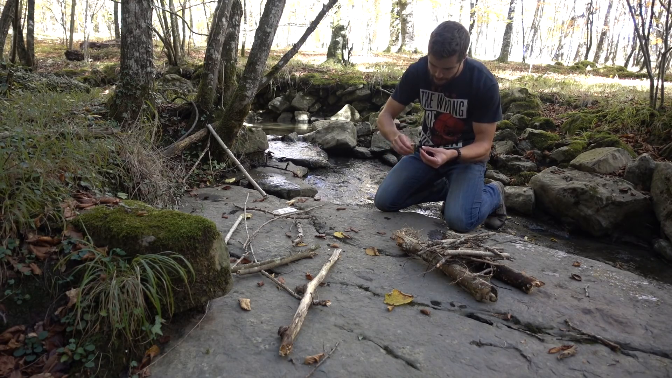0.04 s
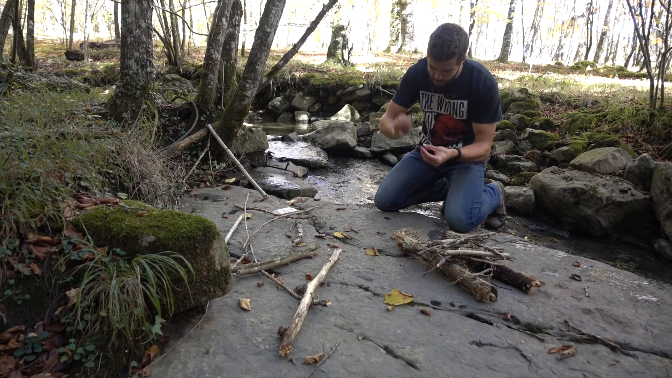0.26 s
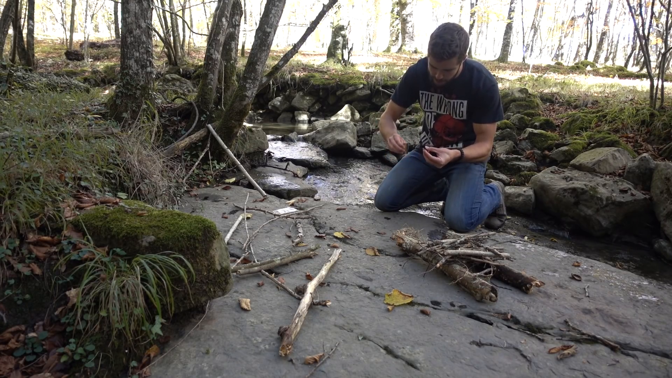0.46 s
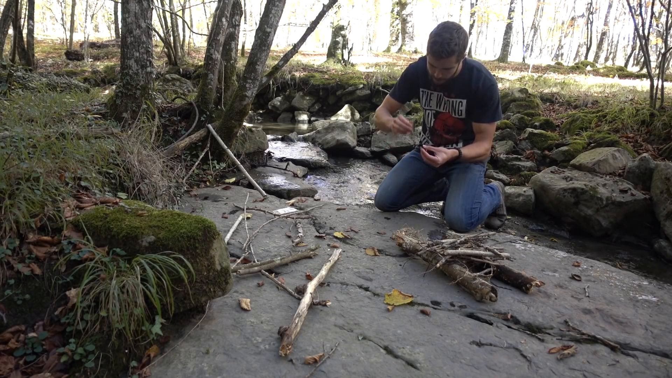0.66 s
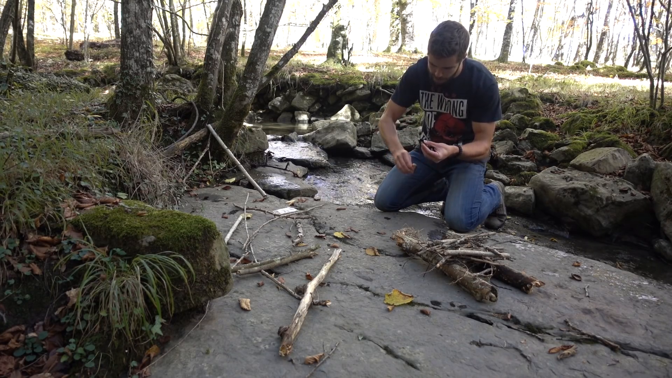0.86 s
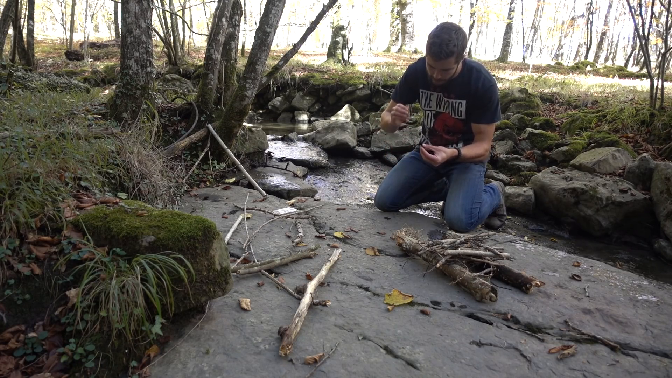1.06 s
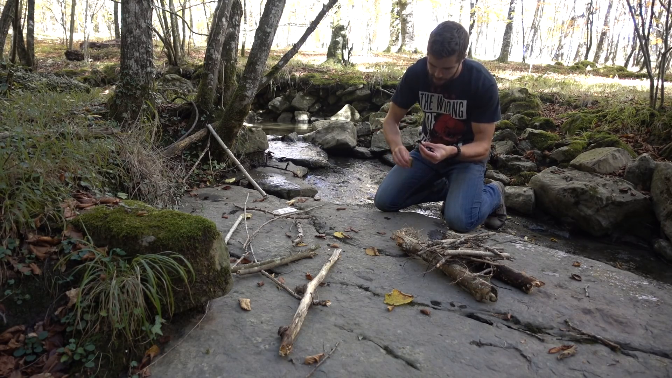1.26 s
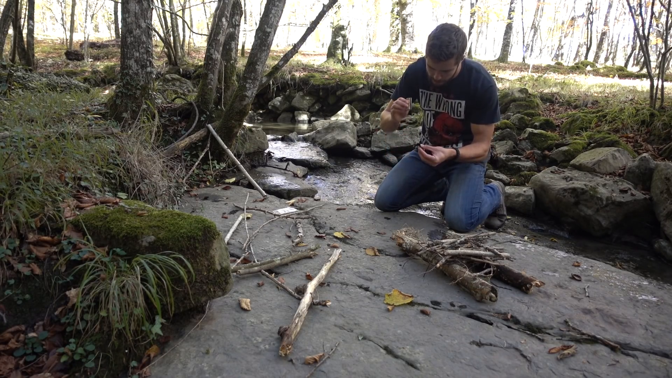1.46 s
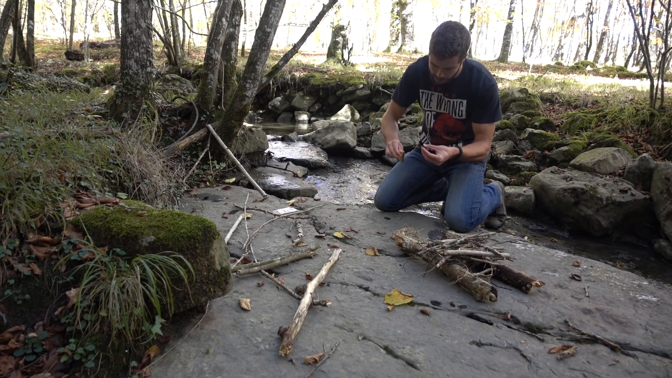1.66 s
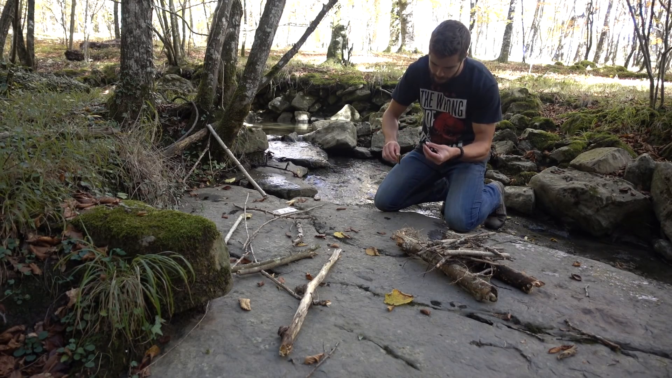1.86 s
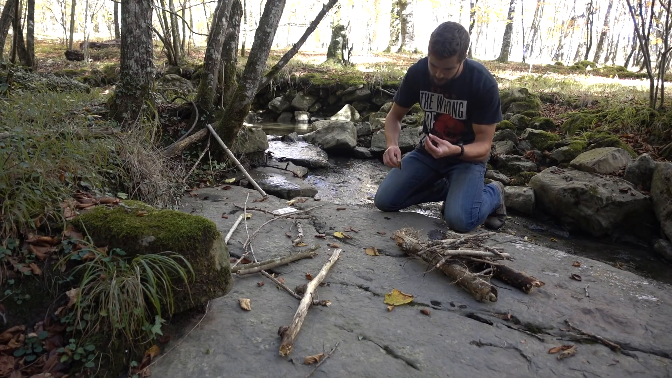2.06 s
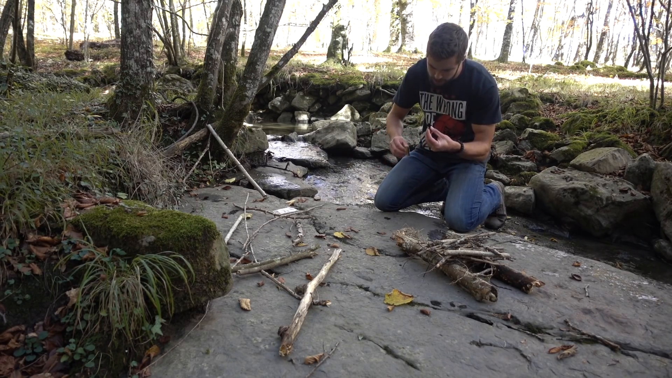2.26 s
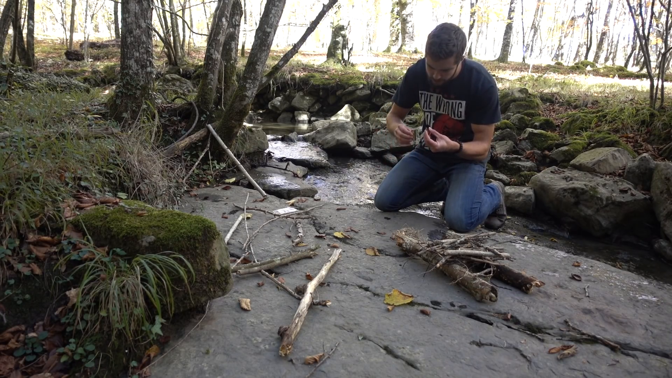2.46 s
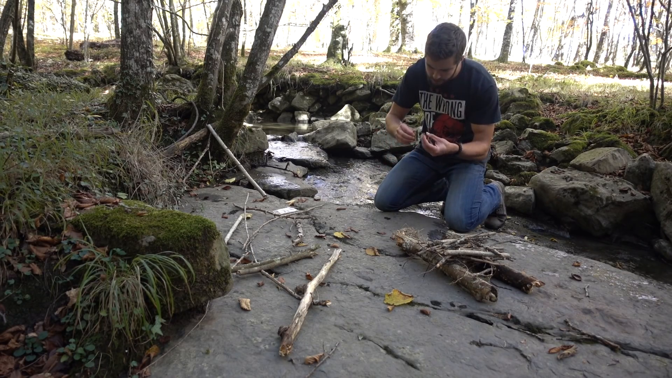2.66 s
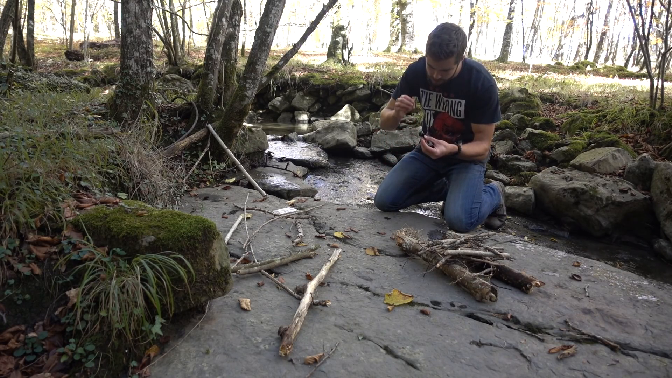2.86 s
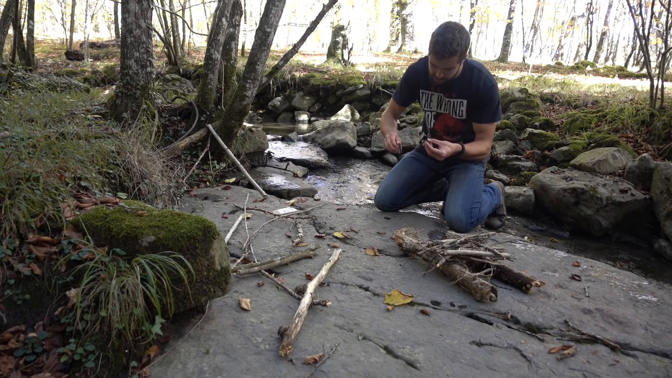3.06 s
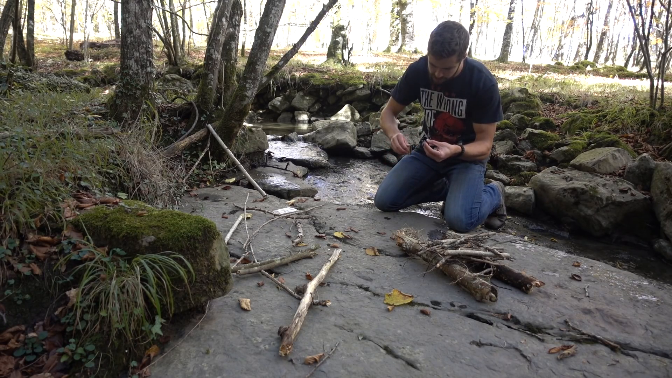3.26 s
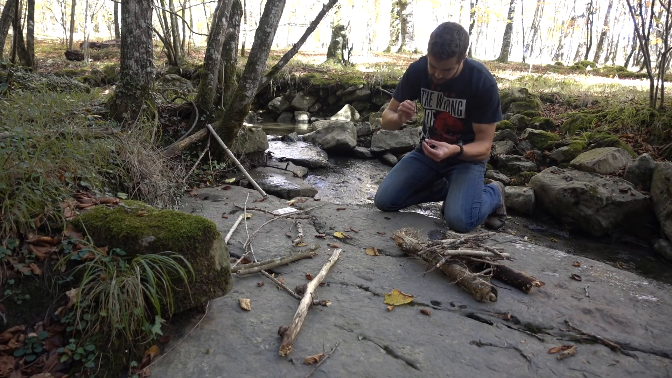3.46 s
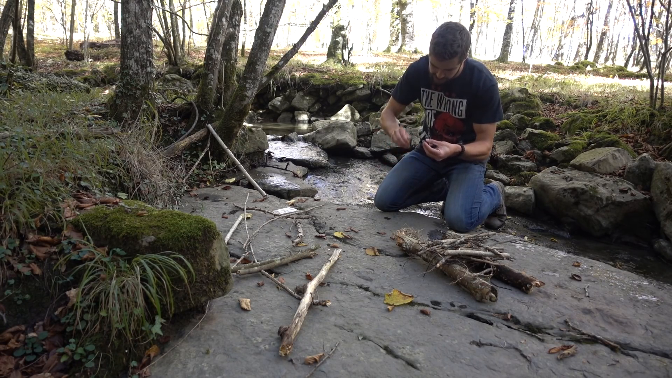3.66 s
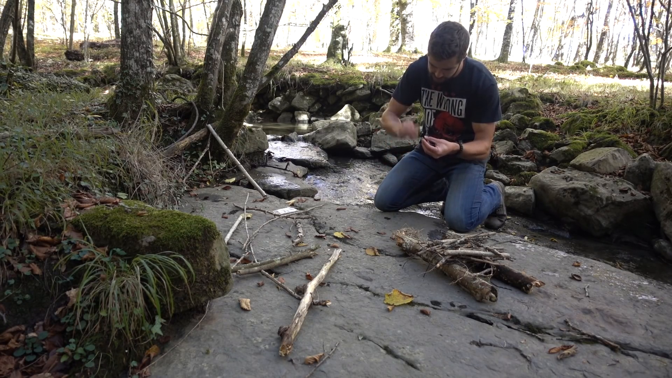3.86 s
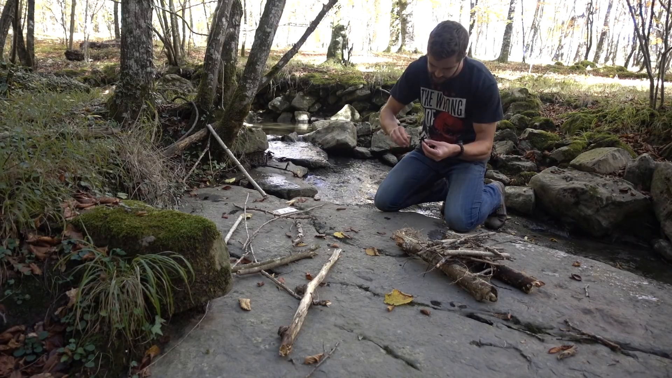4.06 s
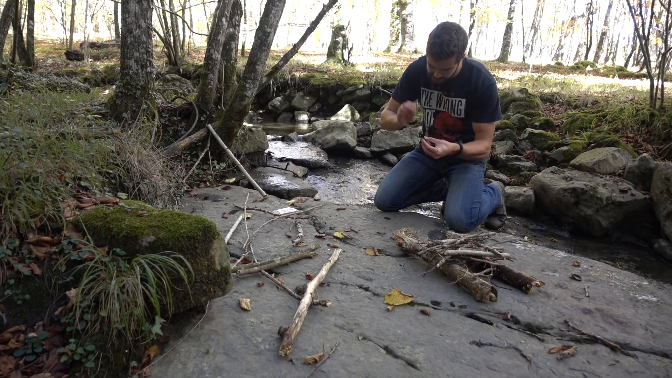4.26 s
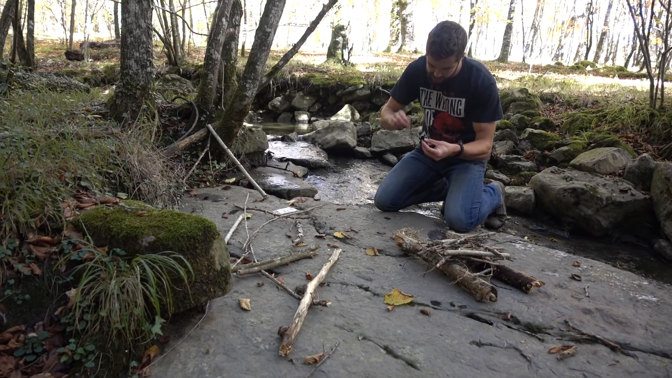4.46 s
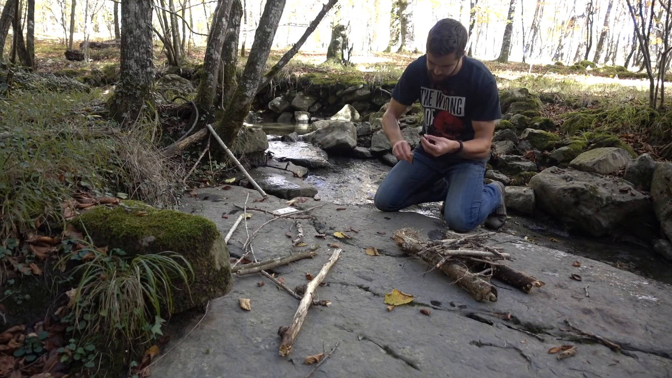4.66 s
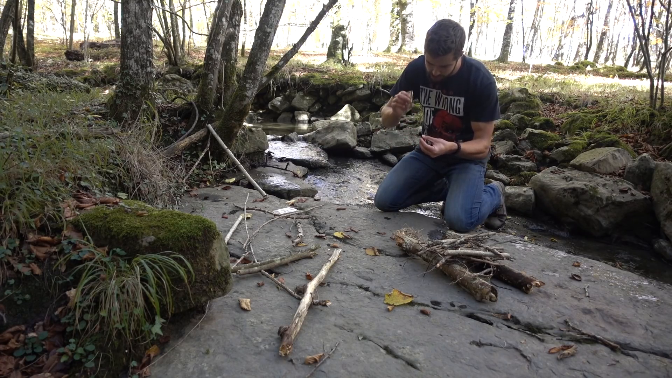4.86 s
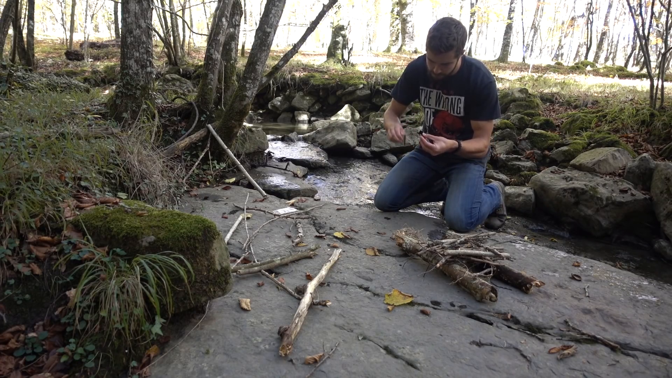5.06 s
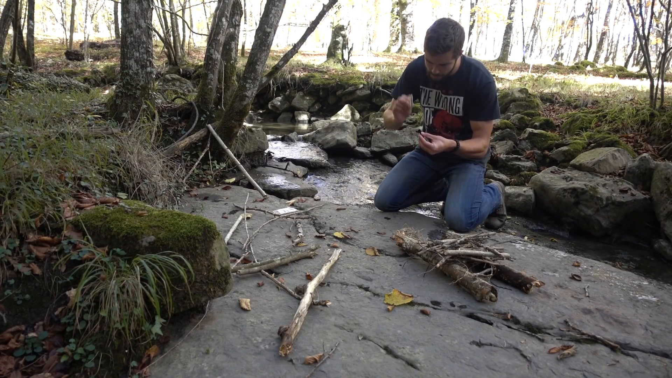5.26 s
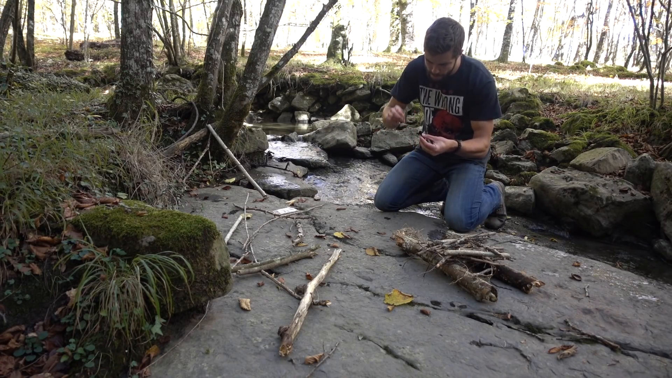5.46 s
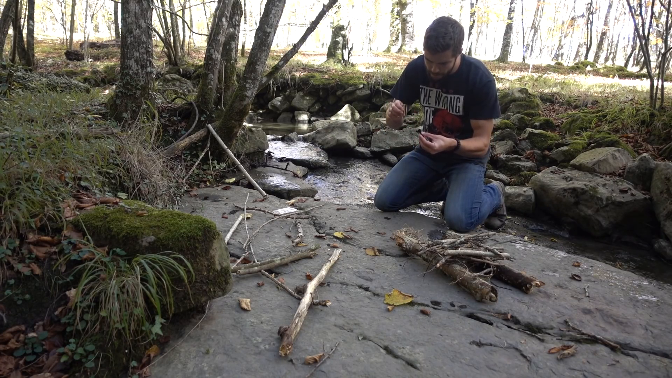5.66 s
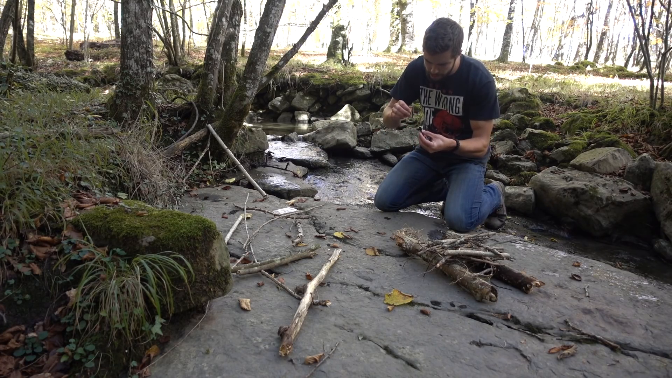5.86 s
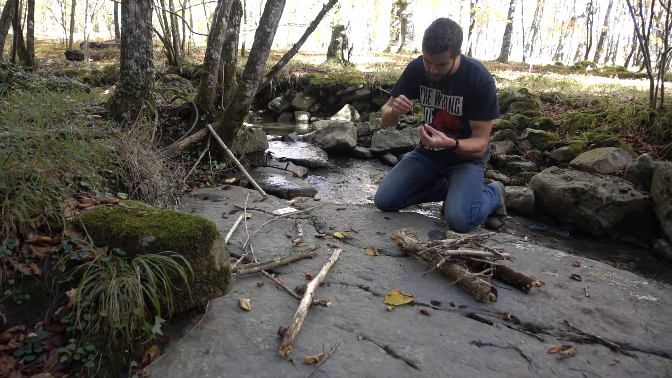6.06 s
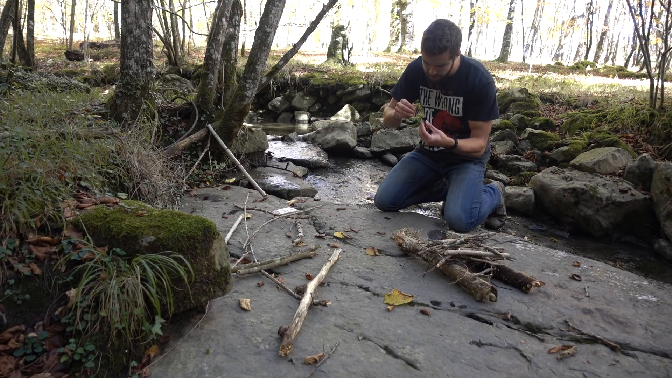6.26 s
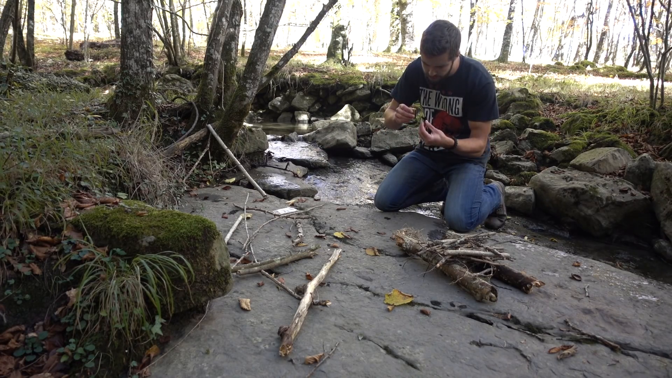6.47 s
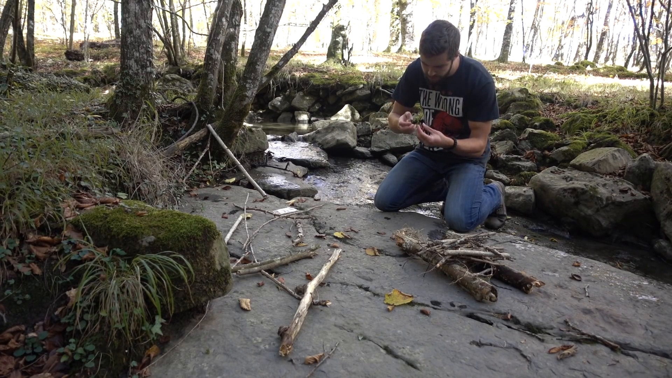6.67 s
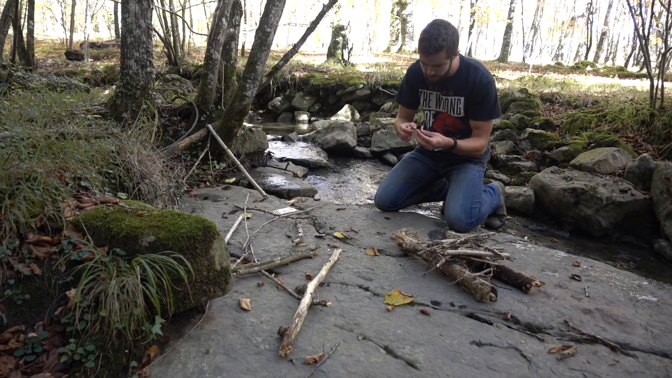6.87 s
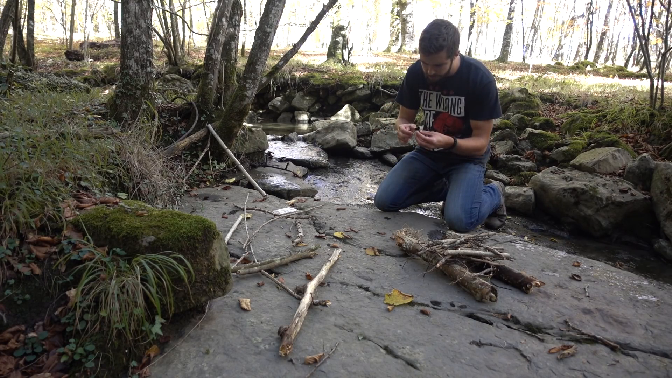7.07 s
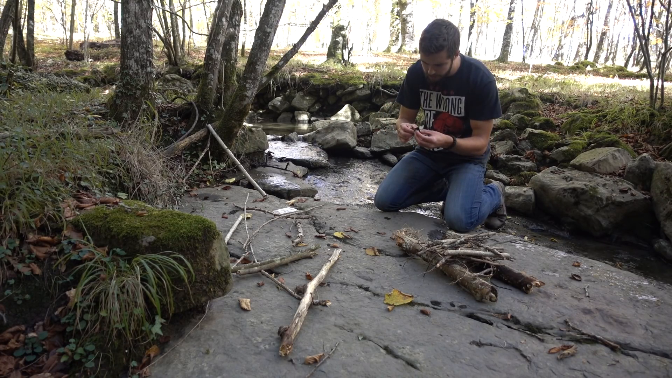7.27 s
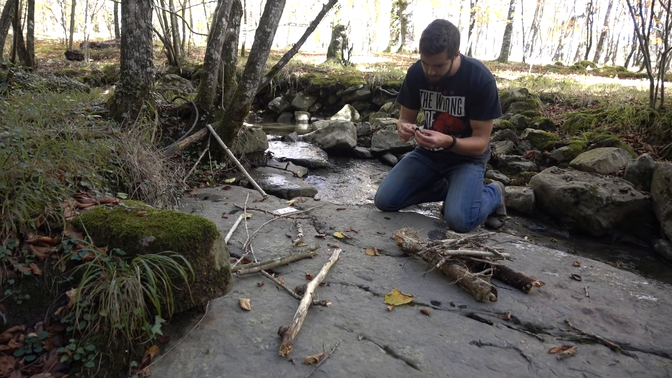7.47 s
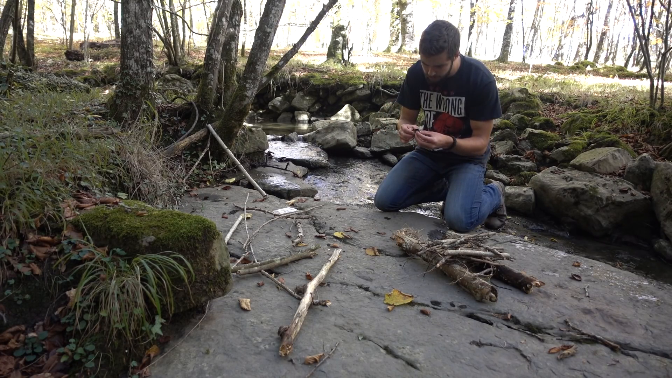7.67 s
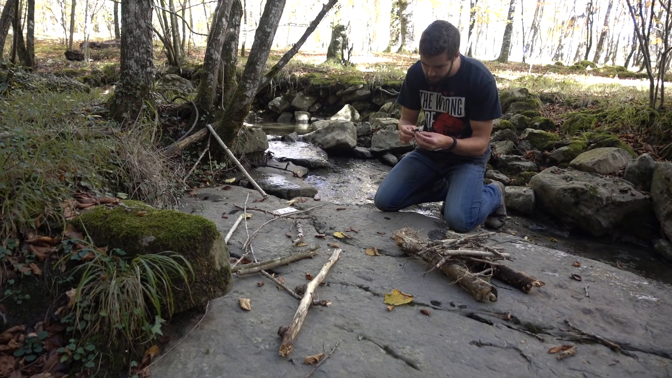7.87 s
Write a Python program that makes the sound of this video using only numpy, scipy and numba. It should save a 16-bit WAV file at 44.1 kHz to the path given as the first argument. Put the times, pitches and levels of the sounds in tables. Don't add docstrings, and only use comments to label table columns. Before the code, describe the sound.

Bright, gritty flint-and-steel strikes ring out six times over steadily trickling, plopping water, then fingers softly crackle dry tinder.

```python
import sys
import numpy as np
from scipy import signal
from scipy.fft import rfft, irfft
from scipy.io import wavfile
from scipy.ndimage import uniform_filter1d
from numba import njit

SR = 44100
rng = np.random.default_rng(int(sys.argv[2]) if len(sys.argv) > 2 else 0)


def master_out(mix):
    frames = np.transpose(np.atleast_2d(mix))
    ceiling = np.clip(frames, -1, 1)
    pcm = np.round(ceiling * 32767).astype(np.int16)
    wavfile.write(sys.argv[1], SR, pcm)


def volts_from_decibels(level):
    exponent = np.asarray(level, float) / 20
    return 10 ** exponent


N = 349272
HZ = np.fft.rfftfreq(N, 1 / SR)
TIME = np.arange(N) / SR
SIDE = np.array([[.5], [-.5]])
STREAM_LEAD = 4


def along_hz(table):
    hz, value = np.transpose(table)
    return np.interp(np.log(HZ + 1), np.log(hz), value)


def colour(x, gain):
    return irfft(rfft(x) * gain, N)


def unit(x):
    return x / np.sqrt(np.mean(x ** 2))


def thin(x, hz):
    return signal.sosfilt(signal.butter(4, hz, "high", fs=SR, output="sos"), x)


def walk(rate):
    k = int(SR / rate)
    steps = np.repeat(rng.standard_normal(N // k + 1), k)
    return uniform_filter1d(uniform_filter1d(steps, k), k)[:N]


def ring(x, hz, width_hz):
    pole = np.exp((2j * np.pi * min(hz, .45 * SR) - np.pi * width_hz) / SR)
    return signal.lfilter([1], [1, -pole], x).imag


@njit
def grains(start, hz, cycles, glide, size, rise, length):
    out = np.zeros(length)
    for k in range(len(start)):
        n = int(cycles[k] * SR / hz[k]) + 2
        i0, turns = int(start[k] * SR), 0.
        for i in range(min(n, length - i0)):
            turns += hz[k] * (1 + glide[k] * (i / n - .2)) / SR
            swell = np.sin(np.pi / 2 * min(turns / rise, 1.)) ** 2
            out[i0 + i] += size[k] * swell * np.exp(-6 * i / n) * np.sin(2 * np.pi * turns)
    return out


def ports(render, db, pan_db, lead):
    left = render(volts_from_decibels(db + pan_db / 2))
    right = render(volts_from_decibels(db - pan_db / 2))
    return np.array([left, np.roll(right, lead)])


def fizz():
    per_s, cycles, spread_db, surge_db = 1900, 27.0, 2.8, 1.77
    u = rng.random((int(per_s * N / SR), 5)).T
    hz = 300 * (15000 / 300) ** u[1]
    size_db = -spread_db * np.log(1 - .995 * u[2])
    size_db = size_db + surge_db * walk(14)[(u[0] * N).astype(int)]
    return unit(grains(u[0] * N / SR, hz, cycles * (.5 + u[3]), 0.26 * u[4], hz * volts_from_decibels(size_db), 2.96, N))


# f/Hz, level/dB (per Hz)
WATER_TONE = [(59, -89), (100, -47), (134, -36), (189, -29.5), (356, -32), (459, -22), (543, -20),
              (847, -7), (1090, -5.5), (1290, -7), (1740, -2), (5230, -11), (9650, -15), (14700, -21),
              (15700, -15)]
# t/s, gurgle level/dB
CHURN = [(0.0, -49.5), (2.05, -49), (2.23, -47), (2.76, -50), (3.4, -49.5), (3.86, -47.5), (4.17, -49.5),
         (4.74, -51), (4.98, -49), (6.62, -50), (7.19, -48), (7.92, -49.5)]
# f/Hz, share in common [0-1]
LIKENESS = [(100, .9), (600, 0.92), (1400, 0.81), (3000, 0.58), (7000, 0.088), (15000, 0.09)]
# f/Hz, left minus right level/dB
WATER_LEAN = [(60, 2.0), (110, 7), (200, -2), (380, 1.5), (700, 3), (1290, 3.5), (2380, 0), (4400, -2.5),
              (8120, -2.0), (15000, -3.5)]


def stream():
    bubbly = np.clip(along_hz([(300, 0.59), (1500, 0.67), (4000, 0.16), (12000, 0.33)]), .01, .99)
    water = []
    for _ in range(3):
        smooth = rng.standard_normal(N)
        water.append(colour(fizz(), np.sqrt(bubbly)) + colour(smooth, np.sqrt(1 - bubbly)))
    like = np.clip(along_hz(LIKENESS), .01, .99)
    near = colour(water[0], np.sqrt(like))
    far = colour(np.array(water[1:]), np.sqrt(1 - like))
    both = np.array([near, np.roll(near, STREAM_LEAD)]) + far
    tilt = volts_from_decibels(along_hz(WATER_TONE) + SIDE * along_hz(WATER_LEAN))
    low = 1 / (1 + (HZ / 3500) ** 4)
    s, gurgle_db = np.transpose(CHURN)
    spray_db = -57 - .45 * (gurgle_db + 48.5)
    gurgle_level = volts_from_decibels(np.interp(TIME, s, gurgle_db) + 0.5 + 0.97 * walk(12))
    spray_level = volts_from_decibels(np.interp(TIME, s, spray_db) + 3.0 + 0.38 * walk(29))
    gurgle = unit(colour(both, tilt * np.sqrt(low))) * gurgle_level
    spray = unit(colour(both, tilt * np.sqrt(1 - low))) * spray_level
    return gurgle + spray


# t/s, peak level/dB, f/Hz, length [cycles]
LEDGE = [(0.155, -26.5, 1560, 11.6), (0.954, -37.5, 1154, 29), (0.982, -32, 1670, 17),
         (1.058, -34.5, 1540, 14), (1.118, -37, 1540, 17), (1.184, -29, 1600, 25), (1.28, -34.5, 1110, 22),
         (1.698, -31, 1766, 45), (2.419, -26.5, 1360, 8.5), (2.777, -35.5, 1256, 25),
         (2.815, -33, 1750, 26), (3.622, -34.5, 1230, 12), (3.724, -32, 1480, 21), (4.286, -34, 2110, 14),
         (4.348, -21.5, 1450, 10.3), (4.393, -38.5, 1015, 26), (4.656, -34.5, 1635, 44),
         (4.81, -31, 1680, 34), (4.955, -31.5, 1105, 21), (5.171, -39, 1110, 24), (5.421, -31, 1670, 20),
         (6.829, -33.5, 1810, 16), (6.861, -39.5, 1147, 42), (6.956, -39, 1160, 37),
         (7.061, -31, 1610, 16.5), (7.142, -36.5, 900, 16), (7.688, -27, 1356, 23), (7.899, -41, 1080, 30)]
# t/s, peak level/dB, f/Hz, length [cycles]
RIFFLE = [(0.017, -32, 1900, 14), (0.202, -29.5, 1625, 29), (0.322, -31.5, 1700, 28),
          (0.806, -34, 1700, 16), (1.018, -36, 1680, 14), (1.212, -31.5, 2160, 26), (1.647, -31, 2070, 15),
          (1.809, -32, 2970, 31), (2.068, -32, 1630, 16), (2.336, -29, 1430, 16.5), (2.585, -34, 1720, 21),
          (2.895, -27.5, 1640, 11), (3.068, -37, 2590, 14), (3.363, -29, 1034, 12), (3.705, -29, 2300, 17),
          (3.986, -32, 1510, 14), (4.096, -35.5, 2290, 31), (4.174, -39.5, 892, 48),
          (4.21, -30.5, 1794, 36), (5.495, -35, 2180, 14), (5.664, -37, 2020, 17), (5.925, -36, 1530, 19),
          (5.971, -32, 2000, 14), (6.099, -33.5, 2500, 29), (6.153, -36, 1480, 28), (6.715, -33, 1730, 33),
          (7.329, -28.5, 2060, 16)]


def bubbles():
    ledge_pan_db, riffle_pan_db, climb = 6.5, 1.2, 0.071
    s, db, hz, cycles = np.array(LEDGE + RIFFLE, float).T
    pan_db = np.repeat([ledge_pan_db, riffle_pan_db], [len(LEDGE), len(RIFFLE)])
    glide = np.full(len(s), climb)
    length = np.clip(1.58 * cycles, 3, 60)
    out = 0
    for k in range(4):
        late, shift, less_db = -.0018, 1, 0
        if k > 0:
            u = rng.random((3, len(s)))
            late, shift, less_db = 0.0052 + .04 * u[0], 0.806 + 0.47 * u[1], 7.2 + 10.0 * u[2]
        plop = lambda size: grains(s + late, hz * shift, length, glide, size, 3.1, N)
        out = out + ports(plop, db + 2.0 - less_db, pan_db, STREAM_LEAD)
    return out


# t/s, peak level/dB, loudest steel ring f/Hz,
# flint knock level/dB and grit level/dB (both against the peak)
CONTACTS = [(0.3712, -13, 6660, -11.5, -10), (1.6192, -21, 7500, -8, 3), (1.6205, -18, 7000, -8, -4),
            (1.6227, -9, 8250, -14, -8), (1.6250, -10.5, 8300, -14, -10), (3.0365, -13.5, 6500, -6, 2),
            (3.0388, -10.5, 8000, -15, -5.5), (3.0399, -11.5, 10260, -3, -6), (3.0430, -9, 8600, -2.5, -8),
            (3.9520, -22.5, 7600, -6, -12), (3.9546, -7, 6900, -10, -19), (3.9610, -34, 6100, 1, -4),
            (5.035, -19.5, 8260, -14, -14), (5.0393, -11, 9450, -4, -3), (5.0406, -13, 4930, 1, -2),
            (5.0427, -10.5, 8300, -9, -16), (5.0463, -21, 6440, -3, -12), (5.386, -23, 8800, -14, 0),
            (5.3863, -28, 5200, 12, -8)]
# f/Hz, width [Hz], level/dB
STEEL = [(3530, 270, -21.5), (4960, 155, -17), (6240, 280, -19.5), (7000, 137, -13.5), (8100, 240, -5.5),
         (9640, 176, -15), (10600, 550, -49), (14900, 2000, -42)]
# f/Hz, width [Hz], level/dB
FLINT = [(2050, 180, 19.5), (2300, 220, 18), (2685, 380, 15.5), (3400, 400, -9)]


def blows():
    size = 1600
    scatter_db = 2.0
    far_db_per_octave = 10.5
    rings, chips, t = np.zeros(N), np.zeros(N), np.arange(size) / SR
    for s, db, ring_hz, knock_db, grit_db in CONTACTS:
        skid_ms = np.clip(2.5 + 0.02 * (db + 5), .2, 6)
        grit = np.clip(rng.standard_normal(size), -2.2, 2.2) ** 3 * volts_from_decibels(-27)
        grit = grit * np.exp(-1000 * t / skid_ms)
        grit[0] = 1
        steel, flint = np.zeros(size), np.zeros(size)
        for hz, width_hz, mode_db in STEEL + [(ring_hz, 600, -1.5)]:
            mode_db = mode_db + scatter_db * rng.standard_normal()
            mode_db = mode_db - far_db_per_octave * abs(np.log2(hz / ring_hz))
            steel += volts_from_decibels(mode_db) * ring(grit, hz, width_hz)
        for hz, width_hz, mode_db in FLINT:
            mode_db = mode_db + scatter_db * rng.standard_normal()
            detuned_hz = hz * (1 + 0.0087 * rng.standard_normal())
            flint += volts_from_decibels(mode_db) * ring(grit, detuned_hz, width_hz)
        both = steel / np.abs(steel).max() + volts_from_decibels(knock_db) * flint / np.abs(flint).max()
        i = int(s * SR)
        rings[i:i + size] += volts_from_decibels(db) * both
        chips[i:i + size] += volts_from_decibels(db + grit_db) * grit
    return thin(rings, 2010), thin(chips, 1600)


# f/Hz, left minus right level/dB
BLOW_LEAN = [(1000, 0), (2500, -1.5), (8000, -3.5), (14000, -4)]


def straight(rings, chips):
    lag = 0.79
    hit = rings + 0.55 * chips + 1.34 * ring(chips, 15600, 2500)
    return colour(hit, volts_from_decibels(SIDE * along_hz(BLOW_LEAN)) * np.exp(-2j * np.pi * HZ / SR * SIDE * lag))


# f/Hz, level/dB (per Hz)
ECHO_TONE = [(400, -27), (1000, -1.5), (2000, 5), (4000, 7.5), (8000, 2.5), (11000, -4.5), (16000, -4)]


def fall(t60_s):
    return np.exp(-np.log(1000) * TIME / t60_s) * (TIME < 1)


def echo_noise():
    return 0.68 * rng.standard_normal(N) + 0.78 * rng.standard_normal((2, N))


def wood(rings, chips):
    low_t60_s, top_t60_s = 0.38, 0.38
    slab = volts_from_decibels(-4) * fall(.03) * (TIME > .003)
    top = 1 / (1 + (5000 / (HZ + 1)) ** 4)
    out = 0
    for t60_s, share in ((low_t60_s, 1 - top), (top_t60_s, top)):
        trunks = volts_from_decibels(-20) * fall(t60_s) * np.clip(TIME / 0.03, 0, 1)
        shape = volts_from_decibels(-16.5) * (slab + trunks)
        energy = np.abs(colour(chips ** 2, rfft(shape ** 2)))
        spray = echo_noise() * volts_from_decibels(3.4 * walk(250)) * np.sqrt(energy)
        ringing = colour(rings, rfft(shape * echo_noise()))
        out = out + colour(ringing + spray, np.sqrt(share))
    return colour(out, volts_from_decibels(along_hz(ECHO_TONE)))


# t/s, peak level/dB, f/Hz
TICKS = [(0.5591, -44, 7640), (0.9484, -46, 5650), (2.2434, -49, 3740), (2.5686, -45, 3520),
         (3.41, -44, 8000), (3.445, -44, 7500), (3.5234, -45, 5430), (4.127, -43.5, 6200),
         (4.5565, -40.5, 9400), (6.1454, -48, 5380), (6.7915, -40.5, 3200), (6.7907, -46.5, 4300),
         (7.027, -49, 6400), (6.805, -47, 7440), (6.9451, -46, 7160), (7.0716, -40.5, 7100),
         (7.108, -44, 7600), (7.3961, -43, 5500), (7.544, -45, 9300), (7.5874, -46, 5440),
         (7.7794, -43, 8150), (7.8096, -47, 5310), (7.8994, -45, 8000)]


def ticks():
    s, db, hz = np.array(TICKS, float).T
    one = np.ones(len(s))

    def tick(size):
        tone = grains(s, hz, 80. * one, 0 * one, size, 1.2, N)
        snap = grains(s, hz, 5.0 * one, 0 * one, size, .6, N)
        return tone + 2.2 * snap

    return ports(tick, db + 1.5, -4, 0)


# start t/s, length [s], loudest level/dB, weave buzz f/Hz at the start, f/Hz at full speed
WIPES = [
    (2.071, .25, -49.5, 2438, 3400),
    (2.5, 0.22, -47, 2354, 2880),
]


def wipes():
    fastest, swell_db, fade_db = .66, 16, 18
    out = np.zeros((2, N))
    for (start, length, top_db, slow_hz, fast_hz), wide_share in zip(WIPES, (.9, .3)):
        s = TIME[(TIME > start) & (TIME < start + length)]
        slack = np.interp(s, start + length * np.array([0, fastest, 1]), [-1, 0, 1])
        db = top_db - slack ** 2 * np.where(slack < 0, swell_db, fade_db)
        hz = fast_hz - (fast_hz - slow_hz) * np.abs(slack) ** 1.4 * np.where(slack < 0, 1, .15)
        carrier = np.exp(2j * np.pi * np.cumsum(np.interp(TIME, s, hz)) / SR)

        def band(width_hz):
            noise = rng.standard_normal((2, N)) + 1j * rng.standard_normal((2, N))
            slow = signal.lfilter([1], [1, -np.exp(-np.pi * width_hz / SR)], noise)
            return unit((slow * carrier).real)

        rub = band(130.) + wide_share * band(1200.)
        level = volts_from_decibels(np.interp(TIME, s, db, left=-120, right=-120))
        out += unit(rub[:1] + 0.81 * rub) * level
    return out


# t/s, level/dB
PINCHES = [
    (6.814, -59),
    (6.952, -54),
    (7.068, -58),
    (7.17, -60),
]


def rustle():
    rise_db_s, fall_db_s = 260, 132
    at, level_db = np.transpose(PINCHES)
    u = rng.random((500, 3)).T
    when = at[0] - .07 + u[0] * (at[-1] - at[0] + 0.15)
    since = when[:, None] - at
    pinch_db = np.max(level_db + np.minimum(rise_db_s * since, -fall_db_s * since), axis=1)
    crackle = lambda size: grains(when, 4800 + 3800 * u[1], 8 + 10. * u[2], 0 * when, size, 1.2, N)
    return ports(crackle, pinch_db + 7.0 + 6.8 * u[2], -2.0, 0)


def scene():
    water = stream() + thin(bubbles(), 600)
    rings, chips = blows()
    echo = wood(0.28 * rings, 2.67 * chips)
    hand = thin(ticks() + wipes() + rustle(), 1400)
    return water + straight(rings, chips) + echo + hand


def top_cut(x):
    return signal.sosfilt(signal.butter(12, 16960, fs=SR, output="sos"), x)


def record(dry):
    dip_s, dip_ms, dip_db = 7.51, 4.2, -15
    dip = volts_from_decibels(dip_db * np.exp(-((TIME - dip_s) * 1000 / dip_ms) ** 2))
    mix = signal.sosfilt(signal.butter(2, 250, "high", fs=SR, output="sos"), dry * dip)
    mix = colour(mix, np.where(HZ > 15850, volts_from_decibels(-32), 1))
    return top_cut(mix)


dry = scene()
out = record(dry)
master_out(out)
```